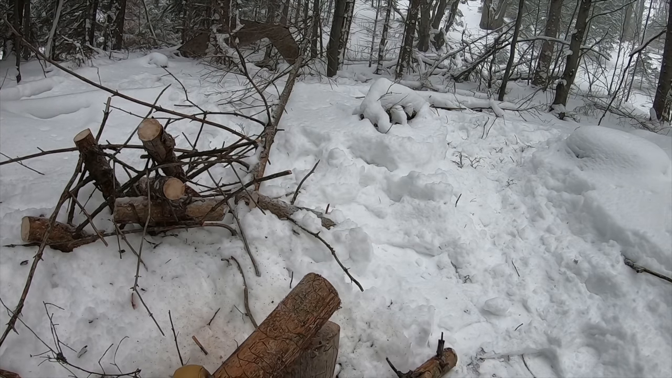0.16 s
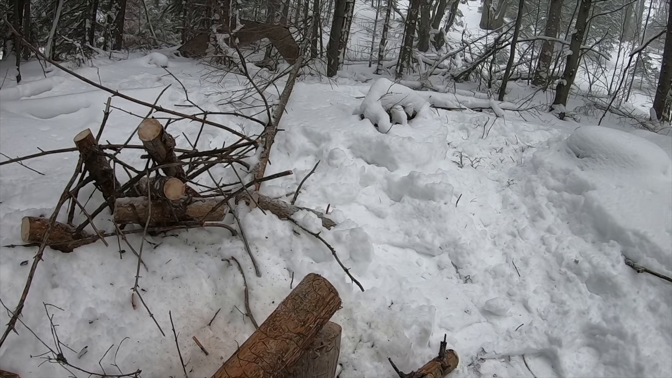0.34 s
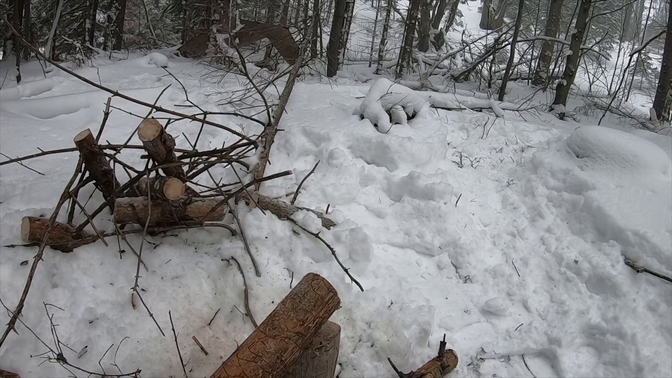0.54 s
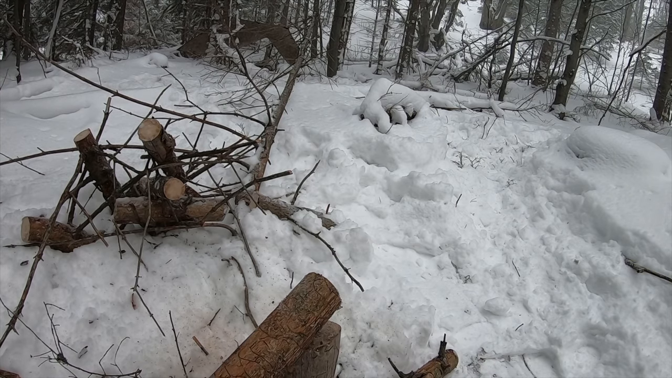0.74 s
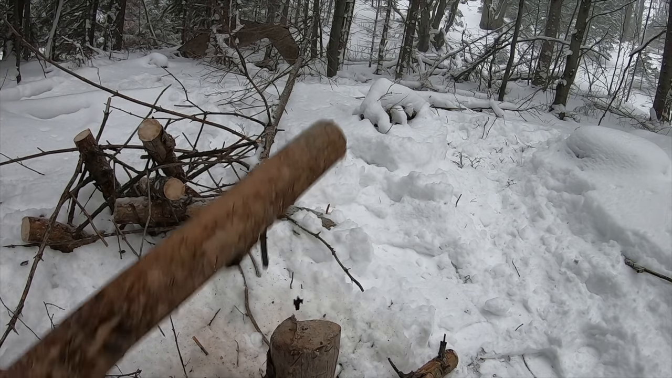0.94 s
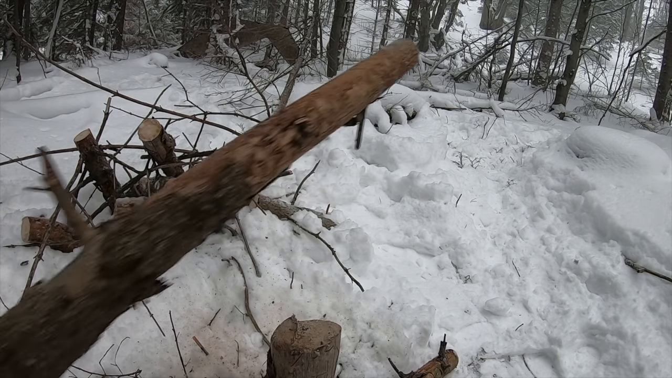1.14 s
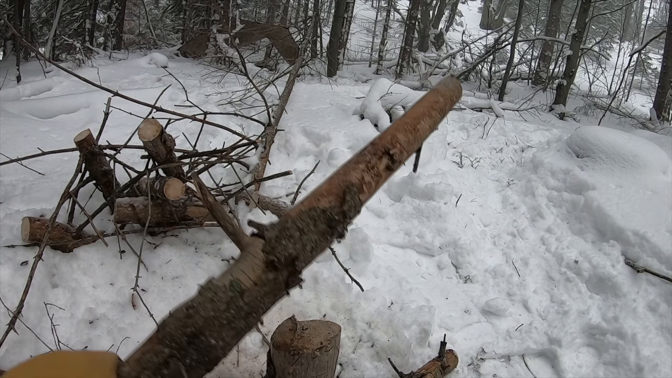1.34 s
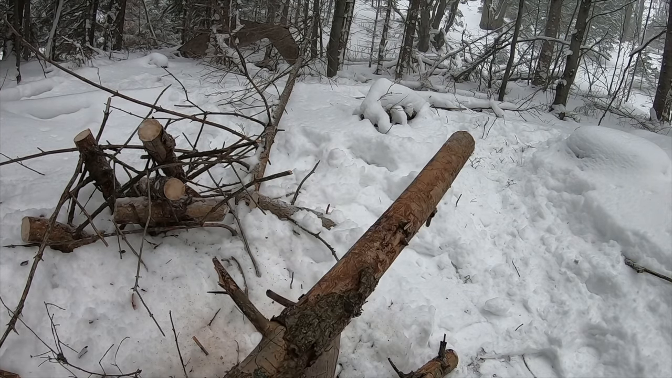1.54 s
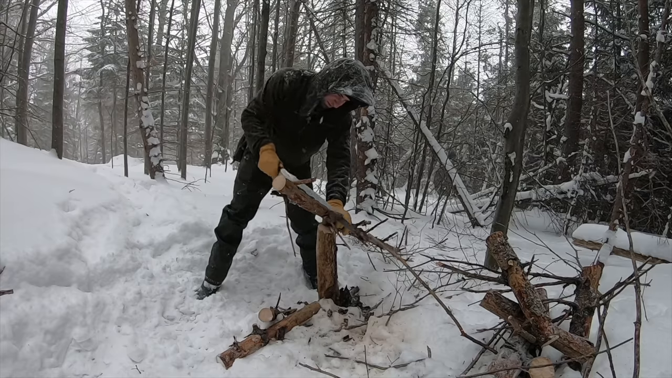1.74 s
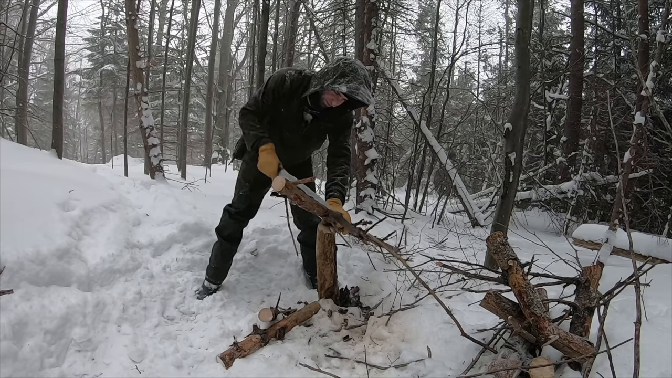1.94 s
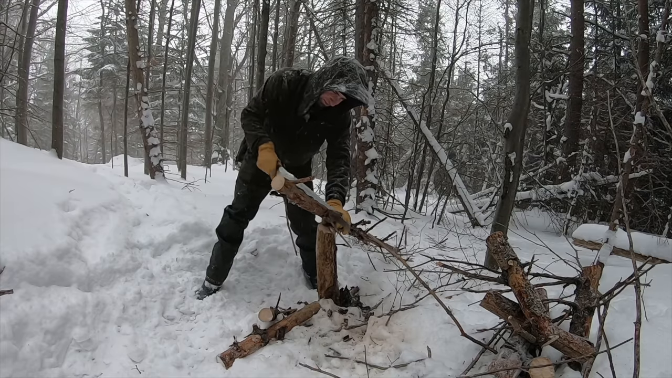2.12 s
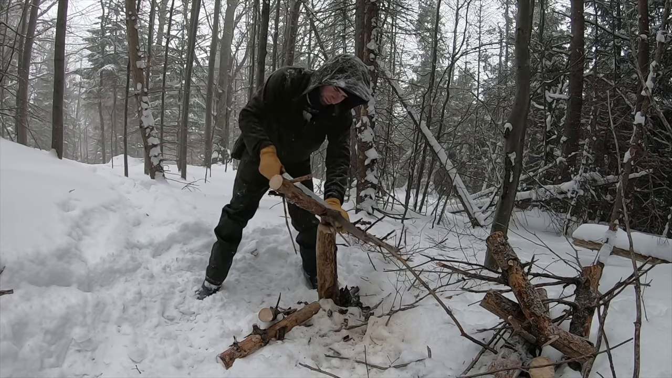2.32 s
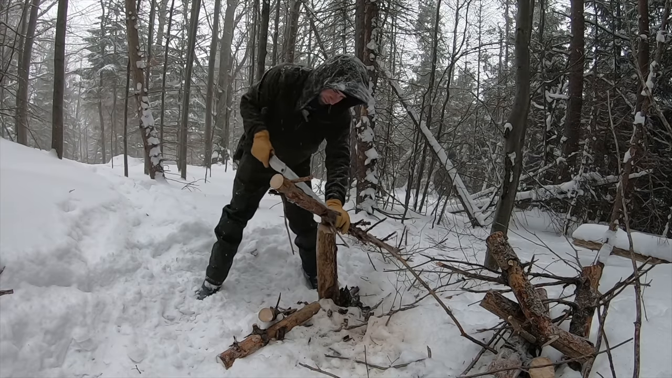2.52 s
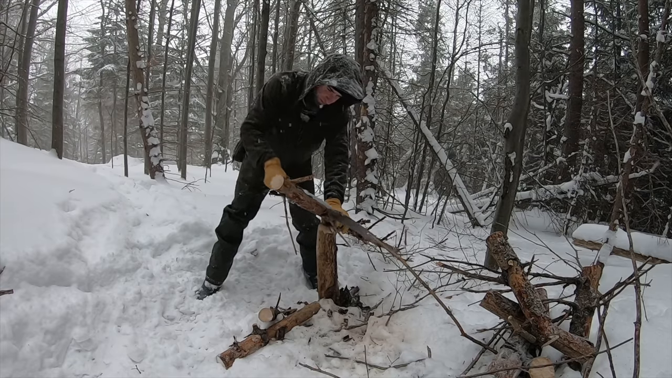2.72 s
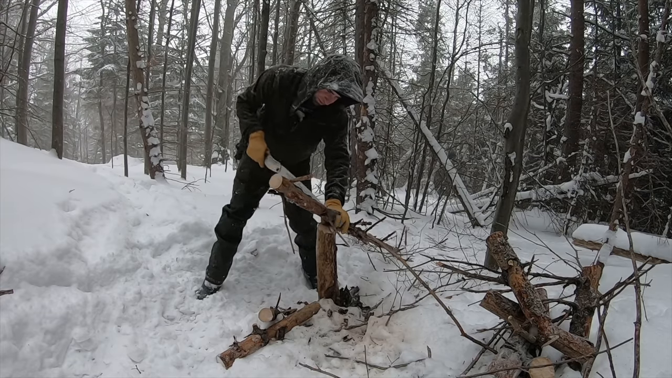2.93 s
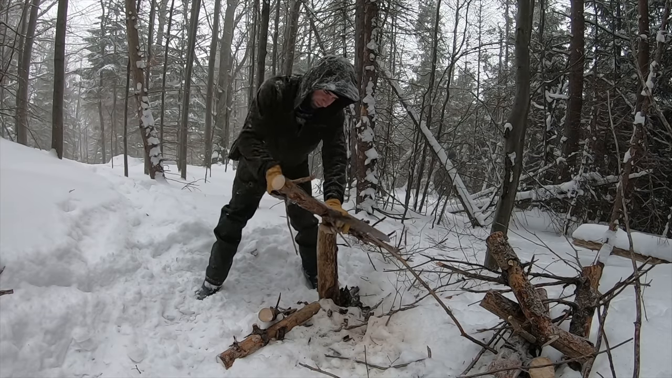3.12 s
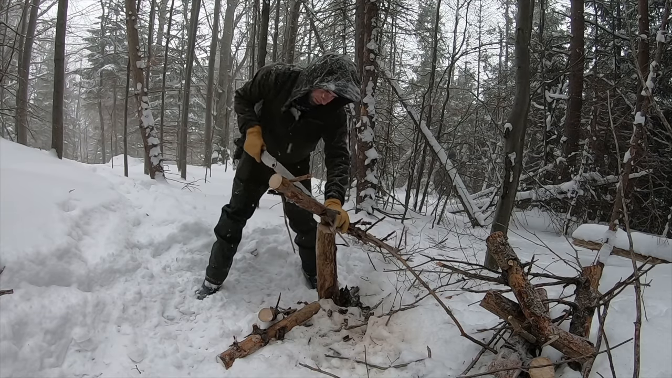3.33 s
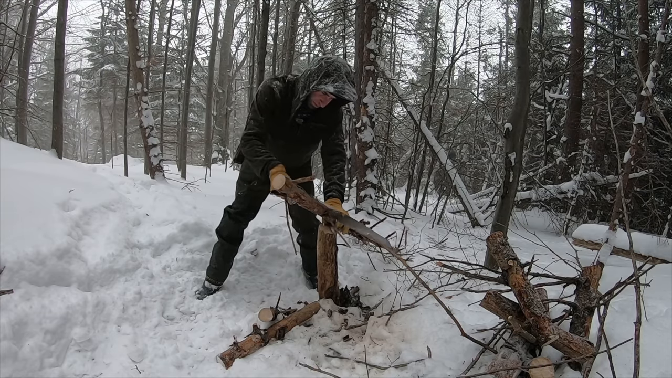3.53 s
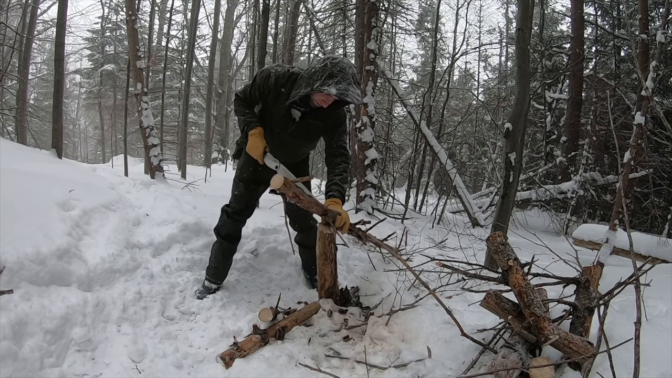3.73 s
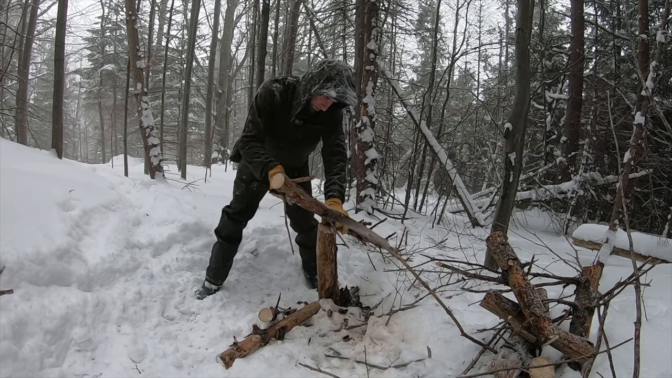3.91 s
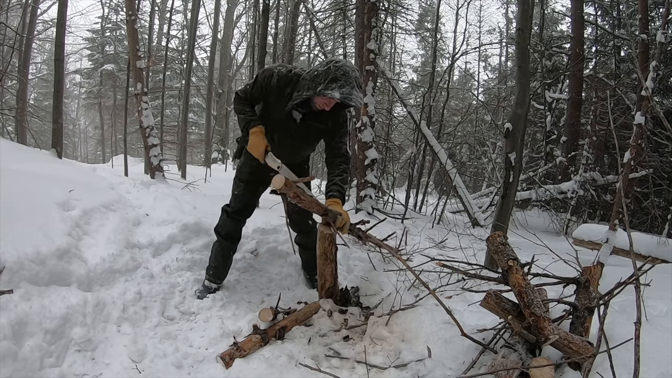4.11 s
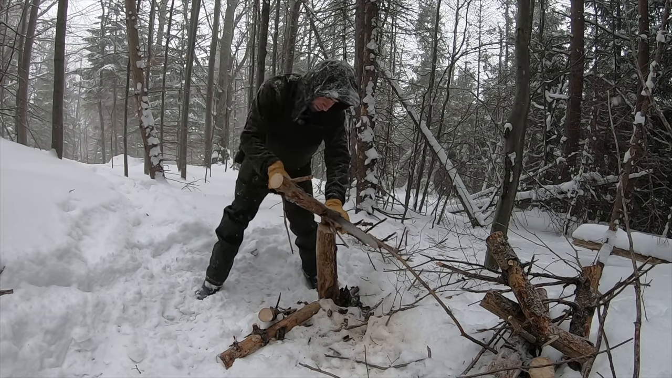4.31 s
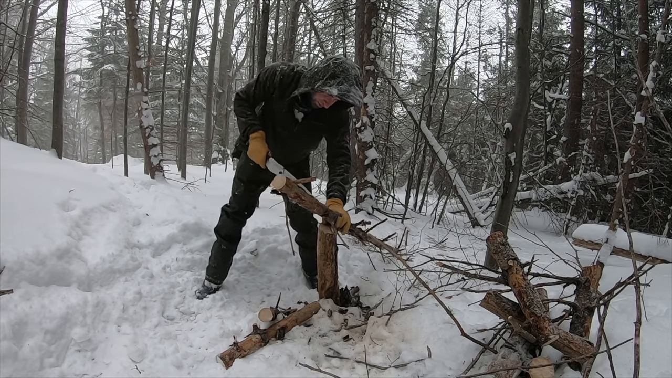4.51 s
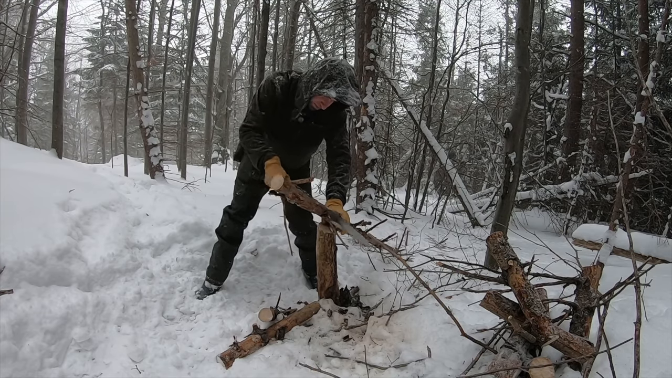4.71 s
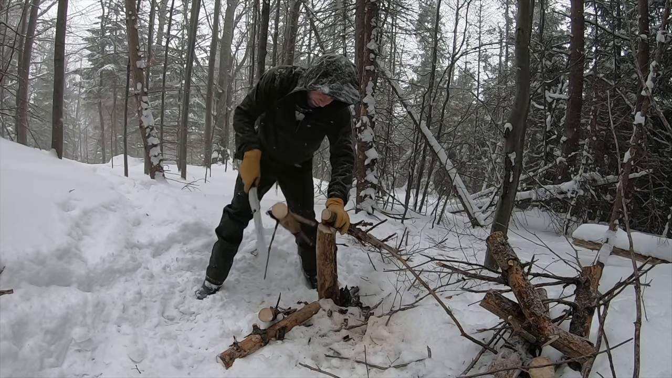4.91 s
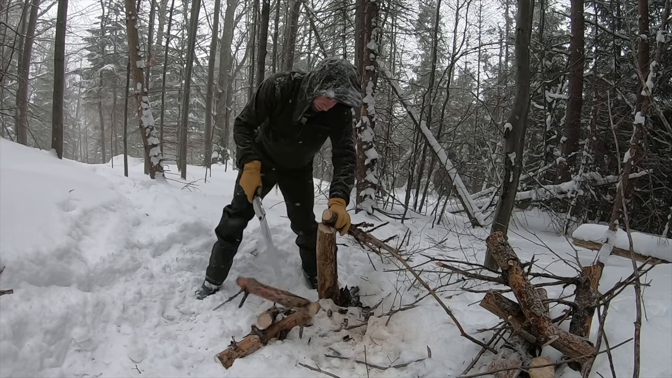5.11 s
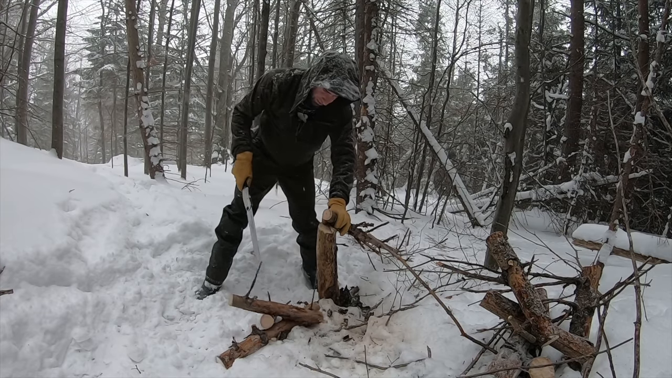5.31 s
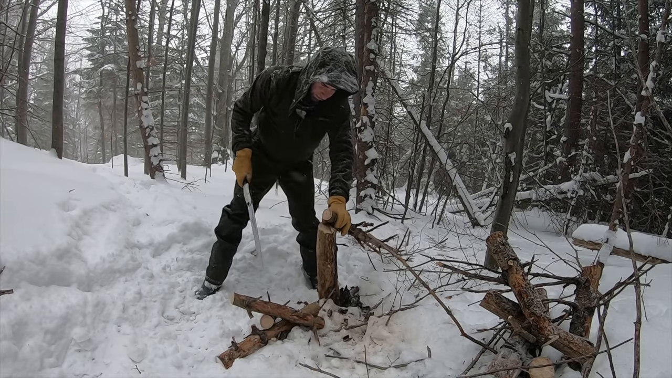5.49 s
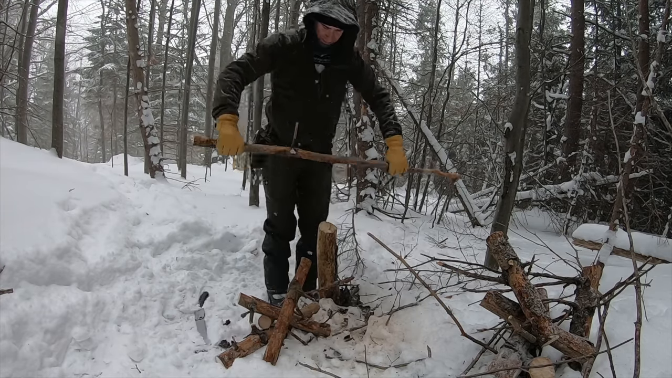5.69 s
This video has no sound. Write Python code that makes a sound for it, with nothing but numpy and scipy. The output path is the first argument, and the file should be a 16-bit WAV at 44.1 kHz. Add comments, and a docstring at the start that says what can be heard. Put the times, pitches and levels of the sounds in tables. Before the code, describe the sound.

The sounds are close, in a still, snowy forest with very faint low air noise and hardly any echo. In the first half second a boot presses into packed snow with a cluster of dull thuds, and sleeves swish softly. From about 0.7 to 1.3 seconds a branch is picked up with gritty bark scrapes and light knocks. At 1.5 it lands on a stump with a low thump. From 1.8 to 4.9 seconds a folding hand saw dominates, cutting in seventeen quick, even, rasping strokes, about five a second, the pulls slightly louder than the pushes. The teeth occasionally catch or squeak, and the branch shudders with a low hum that grows in the second half. At 5.1 the end snaps off and the steel blade rings briefly. The piece clonks onto a log at about 5.25 with a small bounce, followed by faint rustling.

```python
"""In a snowy wood a boot presses the snow down with dull thuds, and sleeves swish.
A branch is picked up, its bark scraping and its modes sounding at each knock, and laid on a stump.
A folding saw cuts it in seventeen quick strokes: teeth tear fibres and excite wood and blade,
while the branch shudders in its lowest bending mode. At last the end snaps off, the freed blade
rings in damped free vibration, and the offcut drops onto another log."""
import sys
import numpy as np
from scipy import signal
from scipy.fft import rfft, irfft, next_fast_len
from scipy.io import wavfile
from scipy.ndimage import uniform_filter1d, map_coordinates

SR = 44100
rng = np.random.default_rng(int(sys.argv[2]) if len(sys.argv) > 2 else 0)


def pcm_store(signal):
    """Save signal as 16-bit PCM."""
    levels = np.round(np.clip(np.atleast_2d(signal), -1, 1) * 32767)
    wavfile.write(sys.argv[1], SR, levels.astype(np.int16).T)


N = 253574
TIME = np.arange(N) / SR

# Levels in all tables are relative; each source applies its own gain.
# still winter air: f/Hz, level/dB
AIR_SPECTRUM = [(25, -3.5), (60, -5.5), (130, 6.5), (250, 6), (600, -3), (1000, -3), (2000, -17),
                (4500, -51), (9000, -27.5), (12000, -50), (15500, -50)]
# reverberation time among the trees: f/Hz, t60/s
FOREST_DECAY = [(150, 1), (1000, 0.57), (4000, 0.29), (12000, 0.37)]
# arm movements: fastest at t/s, half width/s, level/dB
ARM_SWINGS = [(.13, 0.27, -73), (.44, 0.1, -49.5), (.62, 0.17, -59.5), (.87, 0.082, -51),
              (1.1, 0.14, -52.5), (1.28, 0.075, -54.5), (1.49, 0.042, -59.5), (5.33, 0.12, -60),
              (5.75, .04, -62)]
# rubbing cloth: f/Hz, level/dB
CLOTH_SPECTRUM = [(300, 4), (800, -4), (2100, 0.5), (3100, -2.5), (4500, -2.5), (9000, -10.5), (12300, -26),
                  (15000, -36)]
# snow under a boot: f/Hz, level/dB
SNOW_SPECTRUM = [(35, -60), (60, -28), (138, -2.5), (199, -20), (290, -14), (518, -26), (660, -36),
                 (1500, -42), (1950, -75), (3300, -120)]
# blows of boots and wood on packed snow: t/s, level/dB
SNOW_BLOWS = [(0.021, -25), (0.197, -17.5), (0.256, -19.5), (0.284, -21), (0.366, -22), (0.416, -20),
              (0.44, -23.5), (0.497, -26), (1.061, -25.5), (1.229, -37.5), (1.536, -18.5), (1.555, -24.5)]
# branch or offcut bouncing on its support: t/s, level/dB, t60/s
SUPPORT_BOUNCES = [(1.575, -26, 0.44), (5.152, -41, 0.63), (5.291, -29, 0.23)]
# snow crust and ground under a blow: f/Hz, level/dB
CRUST_SPECTRUM = [(120, -22), (360, 8.5), (650, -16.5), (1500, -20), (8000, -48), (15000, -85)]
GROUND_SPECTRUM = [(20, -25), (70, 35), (150, -21.5), (400, -23), (900, -70)]
# steel, bark and fibres scraping or tearing: t/s, duration/s, level/dB
SCRAPE_EVENTS = [(0.688, 0.03, -39.5), (0.862, 0.047, -39.5), (0.905, 0.019, -31), (0.923, 0.021, -32.5),
                 (1.29, 0.04, -48.5), (1.521, 0.029, -35), (1.556, 0.034, -55.5), (1.705, 0.025, -37),
                 (5.082, 0.018, -36), (5.101, .026, -29), (5.128, .03, -46), (5.342, 0.026, -46.5),
                 (5.612, 0.059, -61)]
# rubbed or tapped bark: f/Hz, level/dB
BARK_SPECTRUM = [(120, -13), (200, -6.5), (1130, -10), (2290, -5.5), (2650, -8.5), (3940, -6), (4470, -8.5),
                 (5070, -7.5), (6190, -13.5), (9550, -24), (15000, -54)]
# steel or bark slipping on wood: t/s, duration/s, initial f/Hz, final f/Hz, level/dB
SQUEAK_GLIDES = [(.93, .015, 5200, 5050, -28), (2.056, .02, 5300, 3500, -24), (3.706, .02, 6000, 5200, -27),
                 (3.722, .01, 3400, 2600, -21), (4.283, .025, 6900, 6700, -31)]
# knocks on the handled branch: t/s, level/dB, f/Hz, t60/s
BRANCH_KNOCKS = [(.248, -32, 2180, 0.017), (0.866, -29, 7070, 0.016), (.907, -24.5, 5350, 0.023),
                 (.915, -24, 4000, .018), (1.004, -19.5, 990, .028), (1.034, -36, 850, 0.063),
                 (1.06, -29.5, 370, 0.036), (1.174, -28.5, 1600, .04), (1.229, -36, 300, .025),
                 (1.295, -43, 900, .05), (1.552, -30.5, 1090, 0.047)]
# modes of the whole branch: f/Hz, bandwidth/Hz, level/dB
BRANCH_MODES = [(477, 56, -10), (685, 31, -1), (1074, 49, 0.5), (1550, 38, -6), (2130, 360, -20),
                (3110, 25, -3)]
# modes of the free blade: f/Hz, level/dB, t60/s
BLADE_MODES = [(870, -17, 0.35), (1220, -12.5, 0.28), (3030, -13, 0.16), (4470, -14, 0.29),
               (4990, -4.5, 0.22)]
# the offcut striking the log: t/s, ring level/dB, crack level/dB
OFFCUT_IMPACTS = [(5.149, -34, -30), (5.2433, -20.5, -22.5), (5.281, -40, -33.5), (5.297, -48, -42)]
# modes of the offcut: f/Hz, level/dB, t60/s
OFFCUT_MODES = [(648, -7, 0.087), (873, -4, 0.11), (920, 4.5, 0.077), (1001, 9.5, 0.051),
                (1210, -3.5, 0.12), (2240, -2.5, 0.031), (2920, 9, 0.015), (3250, -12.5, 0.1),
                (3900, -12, 0.054)]
# crack of each impact: f/Hz, level/dB
CRACK_SPECTRUM = [(150, -4.5), (700, -5.5), (3000, -11.5), (5500, -11.5), (9000, -28.5), (15000, -45)]
# deep rumble as weight comes onto the stump: t/s, level/dB
HEAVE_ENVELOPE = [(1.5, -80), (1.546, -25), (1.578, -32), (1.616, -37), (1.86, -45), (1.916, -57),
                  (2.0, -49)]
# rumble of the loaded stump and of the shaken branch: f/Hz, level/dB
HEAVE_SPECTRUM = [(20, -7), (55, 8), (85, 3.5), (160, -32), (400, -72)]
SHUDDER_SPECTRUM = [(20, -31), (60, -7), (100, 4.5), (150, -14.5), (220, -7), (320, -41), (700, -54.5)]
# pull and push in turn: start t/s, fraction elapsed at top speed, level/dB, shudder level/dB
SAW_STROKES = [(1.755, .48, -21.5, -37.5), (1.948, .66, -24, -38.5), (2.123, .56, -22, -40.5),
               (2.318, .59, -24.5, -41.5), (2.493, .52, -21.5, -39), (2.693, .59, -24, -39),
               (2.876, .54, -20.5, -40), (3.068, .59, -24.5, -40.5), (3.25, 0.56, -20.5, -33),
               (3.442, .61, -24.5, -38), (3.627, .59, -21, -34), (3.817, .64, -25.5, -33),
               (4.001, 0.47, -22, -34), (4.193, 0.54, -25.5, -32.5), (4.371, .55, -22, -31.5),
               (4.566, 0.57, -27, -31), (4.748, .48, -23, -34)]
# a tooth catching on hard fibre: t/s, level/dB
TOOTH_SNAGS = [(2.062, -13.5), (2.249, -21), (2.4294, -17), (3.754, -16), (4.045, -16), (4.0756, -18),
               (4.759, -24.5), (4.833, -14)]
# cutting noise: f/Hz, level/dB
KERF_SPECTRUM = [(100, -45), (170, -4), (221, -11), (437, -15), (626, -11), (714, -17.5), (1230, -8.5),
                 (1980, -13.5), (2940, -5.5), (3300, -11), (6500, -9.5), (8300, -19.5), (9670, -21),
                 (11300, -30.5), (14100, -39), (15500, -49)]
# modes of wood and clamped blade: f/Hz, bandwidth/Hz
SAW_MODES = [(630, 49), (870, 25), (1000, 36), (1220, 116), (1480, 38), (2300, 53), (2880, 117),
             (3500, 140), (4380, 210), (5660, 45), (6700, 34), (9400, 300)]
# stereo balance of the saw: f/Hz, left minus right level/dB
SAW_BALANCE = [(150, 0), (380, 3), (700, 4.5), (1200, -0.5), (3600, 0), (4400, 3), (5200, 12.5), (6800, 8),
               (8100, 17), (9400, -10), (11000, -1)]
# likeness of its two channels: f/Hz, coherence
SAW_COHERENCE = [(200, 1), (700, 0.84), (1400, 0.85), (3100, 1), (4500, 0.97), (6800, 0.27), (15000, 0.9)]

CUT_START_S, CUT_END_S = SAW_STROKES[0][0], 4.938


def amp(db):
    """Amplitude ratio of a level in decibels."""
    return 10 ** (np.asarray(db) / 20)


def unit(x):
    """Normalisation to rms 1."""
    return x / np.sqrt(np.mean(x ** 2) + 1e-20)


def along(points, hz):
    """Interpolation of (f/Hz, value) points on a logarithmic frequency axis."""
    f, v = np.transpose(points)
    return np.interp(np.log(hz + 1), np.log(f + 1), v)


def wobble(rate):
    """Smooth random modulation with rate knots a second."""
    return map_coordinates(rng.standard_normal(int(N * rate / SR) + 4), [TIME * rate])


def held(start, end, attack_s, release_s):
    """Envelope with a linear rise from start and an exponential decay after end."""
    return np.clip((TIME - start) / attack_s, 0, 1) * np.exp(-np.maximum(TIME - end, 0) / release_s)


def filtered(x, response):
    """Linear filtering: the spectrum is multiplied by a frequency response."""
    size = next_fast_len(N + SR // 2)
    return irfft(rfft(x, size) * response(np.fft.rfftfreq(size, 1 / SR)), size)[..., :N]


def coloured(x, spectrum):
    """Spectral shaping by (f/Hz, level/dB) points, at rms 1."""
    return unit(filtered(x, lambda hz: amp(along(spectrum, hz))))


def patchy(x, depth_db, frames=3):
    """Spectral modulation: random resonances, alike in both channels, last a few frames each."""
    spectra = signal.stft(x, nperseg=512)[2]
    field = uniform_filter1d(rng.standard_normal(spectra.shape[-2:]), size=4, axis=0)
    field = uniform_filter1d(field, size=frames, axis=1)
    return signal.istft(spectra * amp(depth_db * unit(field)), nperseg=512)[1][..., :N]


def resonance(f, centre, width):
    """Frequency response of a damped oscillator."""
    return 1j * f * width / (centre ** 2 - f ** 2 + 1j * f * width)


def ring(modes, t):
    """Free vibration: a sum of damped modes, struck at slightly random strengths."""
    return sum(amp(db + rng.normal(0, 1) - 60 * t / t60) * np.sin(2 * np.pi * hz * t)
               for hz, db, t60 in modes)


def grains(rate, spread_db):
    """Shot noise: tiny random impacts of uneven size, rate a second."""
    impulses = (rng.random(N) < rate / SR) * rng.choice([-1, 1], N)
    return unit(impulses * amp(spread_db * np.clip(rng.standard_normal(N), -2, 2)))


def spread(mid, side, side_db):
    """Left and right as sum and difference of a common and a differing part."""
    return np.array([mid + amp(side_db) * side, mid - amp(side_db) * side])


def stereo_noise(side_db):
    """White noise, partly coherent between the channels."""
    return spread(*rng.standard_normal((2, N)), side_db)


def pan(db):
    """Channel gains with mean 1 for a left-right level difference."""
    gains = amp(np.array([db, -db]).reshape(2, -1) / 2)
    return gains / gains.mean(axis=0)


def add(track, s, sound):
    """Superposition of a sound on a track at time s."""
    part = track[round(s * SR):][:len(sound)]
    part += sound[:len(part)]


def winter_air():
    """A diffuse background: low noise, incoherent between the channels."""
    return amp(-61) * coloured(rng.standard_normal((2, N)), AIR_SPECTRUM)


def forest_reverberation(x):
    """Scattering by trunks leaves a faint tail; the snow absorbs the rest."""
    hz, t, spectra = signal.stft(rng.standard_normal((2, SR)), SR, nperseg=256)
    decay = amp(-60 * t / along(FOREST_DECAY, hz)[:, None])
    tail = signal.istft(spectra * decay, SR, nperseg=256)[1]
    return amp(-22.5) * signal.fftconvolve(x, tail / np.linalg.norm(tail[0]), axes=1)[:, :N]


def sleeves(sawing_db=-53, settle_s=0.13):
    """Friction noise of cloth swells with each arm movement and holds during the sawing."""
    cloth = coloured(patchy(stereo_noise(side_db=-3.5), depth_db=2), CLOTH_SPECTRUM)
    swings = sum(amp(db) * np.exp(-((TIME - s) / width) ** 2) for s, width, db in ARM_SWINGS)
    sawing = amp(sawing_db) * held(CUT_START_S - settle_s, CUT_END_S, settle_s, settle_s)
    return (swings + sawing) * cloth


def snow_step():
    """Compaction: snow yields under a boot in many small collapses."""
    collapses = spread(grains(500, spread_db=1.5), grains(540, spread_db=-2), side_db=-2)
    load = held(0.243, 0.527, attack_s=0.026, release_s=0.028)
    return amp(-36) * load * coloured(collapses, SNOW_SPECTRUM) * pan(db=3)


def thuds(rest_hz=118, fall_hz=450, thud_t60=0.16, rise_s=0.0066, bounce_hz=108):
    """Dispersion in packed snow: higher waves arrive first, so each rough thud falls in pitch."""
    blows, touch = np.zeros((2, N))
    t = TIME[:SR // 2]
    for s, db in SNOW_BLOWS:
        pitch = rest_hz * amp(rng.normal(0, .9)) + fall_hz * np.exp(-t / .003)
        phase = 2 * np.pi * np.cumsum(pitch) / SR + .4 * wobble(110)[:len(t)]
        envelope = amp(db + 1 - 60 * t / thud_t60) * (1 - np.exp(-(t / rise_s) ** 2))
        add(blows, s, envelope * np.sin(phase))
        add(touch, s, amp(db - 16 - 60 * t / 0.061) * (1 - np.exp(-(t / 0.00066) ** 2)))
    for s, db, t60 in SUPPORT_BOUNCES:
        envelope = amp(db - 60 * t / t60) * (1 - np.exp(-t / 0.017))
        add(blows, s, envelope * np.sin(2 * np.pi * bounce_hz * t))
    # the crust crackles at first touch and the ground rumbles under each blow
    crust = touch * coloured(rng.standard_normal(N), CRUST_SPECTRUM)
    ground = np.abs(signal.hilbert(blows)) * coloured(stereo_noise(side_db=-2), GROUND_SPECTRUM)
    return blows * pan(db=-18) + crust + amp(-12) * ground * pan(db=-1)


def scrapes():
    """Sliding friction on rough bark: dense micro-impacts come in gritty bursts."""
    impacts = spread(grains(7000, spread_db=5.5), grains(7000, spread_db=2.5), side_db=-10.5)
    grit = coloured(patchy(impacts, depth_db=4), BARK_SPECTRUM)
    knots, shape = np.array([0, 0.32, 0.68, 1.31]), [0.0026, 0.98, 0.66, 0.00079]
    rub = sum(amp(db) * np.interp(TIME, s + length * knots, shape) for s, length, db in SCRAPE_EVENTS)
    return rub * amp(2 * wobble(300)) * grit * pan(db=2.5)


def squeaks():
    """Stick-slip oscillation: a rough tone glides down as the contact slips."""
    tones, waver = np.zeros(N), amp(.22 * wobble(1500))
    for s, length, from_hz, to_hz, db in SQUEAK_GLIDES:
        progress = np.linspace(0, 1, round(length * SR))
        pitch = (from_hz + (to_hz - from_hz) * progress) * waver[round(s * SR):][:len(progress)]
        add(tones, s, amp(db) * np.sin(np.pi * progress) * np.sin(2 * np.pi * np.cumsum(pitch) / SR))
    return tones * pan(db=6)


def knocks(spot_width_hz=350):
    """Impact excitation: rough contacts sound the struck spot and the branch, and tick on its bark."""
    spots, contacts = np.zeros((2, N))
    t = TIME[:SR // 8]
    for s, db, hz, t60 in BRANCH_KNOCKS:
        contact = amp(db - 60 * t / t60) * (1 - np.exp(-(t / .0016) ** 2))
        spot = unit(filtered(rng.standard_normal(N), lambda f: resonance(f, hz, spot_width_hz) ** 2))
        add(spots, s, contact * spot[:len(t)])
        add(contacts, s, contact)
    modes = lambda f: sum((-1) ** k * amp(db) * resonance(f, hz, width)
                          for k, (hz, width, db) in enumerate(BRANCH_MODES))
    wood = amp(-4) * unit(filtered(rng.standard_normal(N), modes))
    bark = amp(-11) * coloured(rng.standard_normal(N), BARK_SPECTRUM)
    return (spots + contacts * (wood + bark)) * pan(db=5)


def freed_blade(release_s=5.108):
    """Free vibration: the blade rings in its own modes as it leaves the wood."""
    blade = np.zeros(N)
    add(blade, release_s, amp(-29) * ring(BLADE_MODES, TIME[:SR // 2]))
    return blade * pan(db=8)


def offcut(crack_t60=0.074):
    """Impulse response: each impact of the cut end gives a noisy crack and a clonk of damped modes."""
    wood, cracks = np.zeros((2, N))
    t = TIME[:SR // 2]
    for s, ring_db, crack_db in OFFCUT_IMPACTS:
        add(wood, s, amp(ring_db - 3) * ring(OFFCUT_MODES, t) * (1 - np.exp(-t / 0.0014)))
        add(cracks, s, amp(crack_db - 60 * t / crack_t60) * (1 - np.exp(-(t / .0006) ** 2)))
    splinter = coloured(stereo_noise(side_db=-8), CRACK_SPECTRUM)
    return (wood + amp(-4.5) * cracks * splinter) * pan(db=1)


def stump_heave():
    """Transient loading: the stump rumbles as weight comes onto it."""
    s, db = np.transpose(HEAVE_ENVELOPE)
    load = amp(np.interp(TIME, s, db, left=-120, right=-120))
    return load * coloured(stereo_noise(side_db=-3), HEAVE_SPECTRUM)


def strokes(overlap_s=.008):
    """Reciprocating motion: swing is the blade speed from rest to rest, spilling over each turn."""
    ends = [row[0] for row in SAW_STROKES[1:]] + [CUT_END_S]
    for k, ((start, fraction, db, shudder_db), end) in enumerate(zip(SAW_STROKES, ends)):
        fastest = start + (end - start) * fraction
        progress = np.interp(TIME, [start - overlap_s, fastest, end + overlap_s], [0, .5, 1])
        swing = np.sin(np.pi * progress).clip(0)
        is_pull = k % 2 == 0
        yield start, end, db, shudder_db, is_pull, swing


def shudder(bend_hz=113, lead_s=0.016, rise_s=0.053, fall_s=0.036, pull_db=-48):
    """Forced vibration of the branch's lowest bending mode: dragged on pulls, shaken before turns."""
    shake = np.zeros(N)
    for _, end, _, shudder_db, is_pull, swing in strokes():
        lag = TIME - (end - lead_s)
        shake += amp(shudder_db) * np.exp(-np.abs(lag / np.where(lag < 0, rise_s, fall_s)) ** 1.47)
        shake += amp(pull_db) * is_pull * swing
    phase = 2 * np.pi * bend_hz * TIME + 0.96 * wobble(28)
    bending = unit(np.sin(phase) * amp(wobble(30)))
    rumble = coloured(rng.standard_normal((2, N)), SHUDDER_SPECTRUM)
    return shake * (bending * pan(db=-18.5) + amp(-5) * rumble * pan(db=0.5))


def tooth_zip(tooth_phase):
    """Periodic contact: a tone at the tooth rate; teeth set left and right add the octave below."""
    tone = np.sin(tooth_phase) * amp(4 * wobble(90))
    subharmonic = .3 * np.sin(tooth_phase / 2) * amp(4 * wobble(90))
    return unit(tone + subharmonic)


def snag_force(t60=0.053, rise_s=0.00052):
    """Impulsive loading: the force jumps and decays when a tooth catches on hard fibre."""
    force, t = np.zeros(N), TIME[:SR // 10]
    for s, db in TOOTH_SNAGS:
        add(force, s, amp(db - 13 - 60 * t / t60) * (1 - np.exp(-t / rise_s)))
    return force


def fibre_rasp(tooth_phase):
    """Source and filter: tearing fibres and splinters excite the modes of wood and clamped blade."""
    tearing = rng.standard_normal((2, N)) * (1 + .5 * np.sin(tooth_phase / 2))
    splinters = np.array([grains(450, spread_db=4), grains(450, spread_db=4)])
    # the wood's resonances flicker from tooth to tooth and drift as the blade slides
    flickering = patchy(tearing, depth_db=2.3) + .65 * splinters
    drifting = patchy(flickering, depth_db=2.6, frames=16)
    body = lambda f: 1 + amp(-1) * sum(resonance(f, hz, width) for hz, width in SAW_MODES)
    return coloured(filtered(drifting, body), KERF_SPECTRUM)


def saw_image(mid_side):
    """Partial coherence: mid and side mix to left and right in proportions that vary with frequency."""
    angle = lambda f: np.arccos(np.clip(along(SAW_COHERENCE, f), 0, 1)) / 2
    mid, side = filtered(mid_side, lambda f: np.array([np.cos(angle(f)), np.sin(angle(f))]))
    return filtered(spread(mid, side, side_db=0), lambda f: pan(along(SAW_BALANCE, f)))


def saw(tooth_hz=1800, rub_hz=1900, skate_s=.025, skate_db=-3.5, deepen_db_per_s=1, pull_zip_db=-7):
    """Fracture and friction: teeth rasp through fibres and zip over the kerf, most on the push."""
    speed, force, drag, ride = np.zeros((4, N))
    mid_cut_s = SAW_STROKES[8][0]
    for start, _, db, _, is_pull, swing in strokes():
        speed += swing
        # after each turn the teeth skate before they bite
        force += amp(db + skate_db * (TIME < start + skate_s)) * swing ** 2.09
        # a deeper kerf rubs more of the blade
        drag += amp(db + deepen_db_per_s * (start - mid_cut_s)) * swing ** 1.32
        ride += amp(db + is_pull * pull_zip_db) * swing ** 2
    jitter = amp(.5 * wobble(500) + .25 * wobble(50))
    tooth_phase = 2 * np.pi * np.cumsum(tooth_hz * speed ** 1.3 * jitter) / SR
    zipping = amp(-20.5) * ride * tooth_zip(tooth_phase)
    pressure = amp(0.52 * wobble(170) + 0.88 * wobble(29))
    rasp = fibre_rasp(tooth_phase)
    # slow teeth rub rather than cut, which leaves the low part of the rasp
    rubbing = filtered(rasp, lambda f: 1 / (1 + (f / rub_hz) ** 4))
    cut = (rasp - rubbing) * (amp(-4.6) * force * pressure + snag_force())
    cut += amp(-8.5) * rubbing * drag * pressure
    cut[0] += zipping  # mid channel only
    # the steel keeps singing faintly between the strokes
    steel = lambda f: (resonance(f, 2878, 5.8) + .32 * resonance(f, 4356, 8.5)
                       + .25 * resonance(f, 4970, 7))
    return saw_image(cut + amp(-5) * filtered(cut, steel))


def scene():
    """Superposition of the work at the stump, its reverberation and the still air."""
    near = saw() + snow_step() + sleeves() + scrapes() + knocks() + freed_blade() + offcut() + squeaks()
    return winter_air() + near + shudder() + stump_heave() + thuds() + forest_reverberation(near)


def record(dry, top_hz=15500):
    """Band limiting: an ideal low-pass filter removes everything above top_hz."""
    return filtered(dry, lambda hz: hz < top_hz)


dry = scene()
out = record(dry)
pcm_store(out)
```